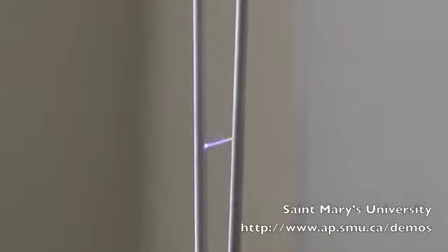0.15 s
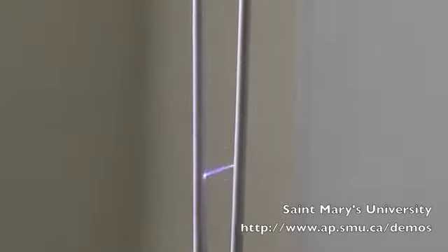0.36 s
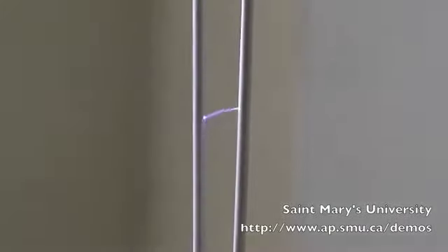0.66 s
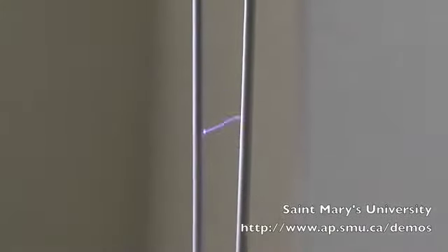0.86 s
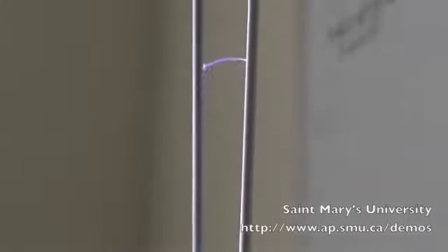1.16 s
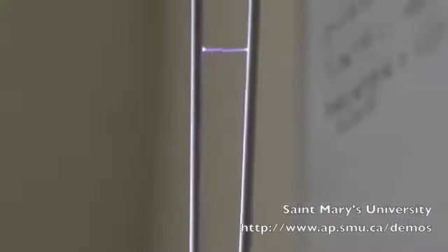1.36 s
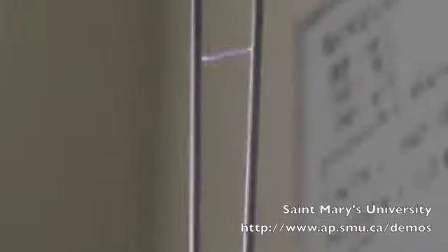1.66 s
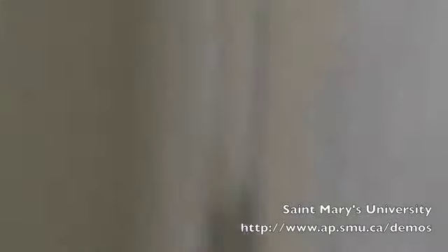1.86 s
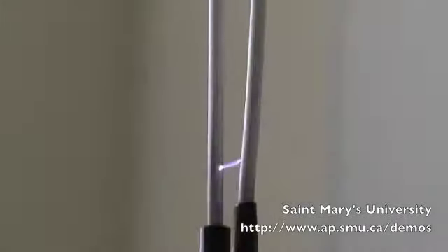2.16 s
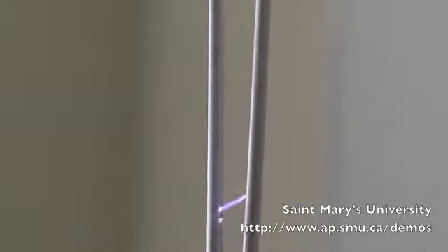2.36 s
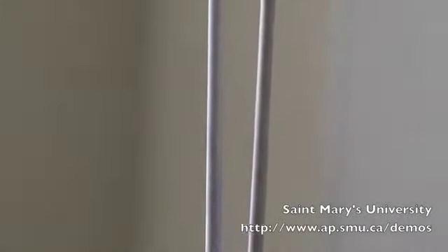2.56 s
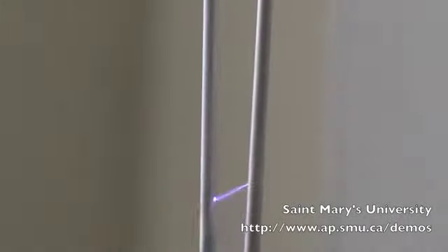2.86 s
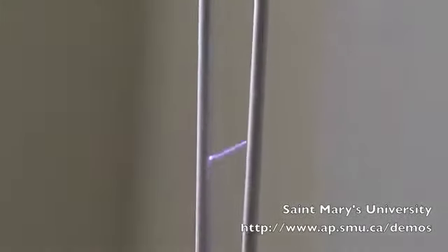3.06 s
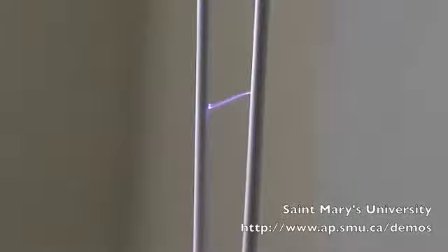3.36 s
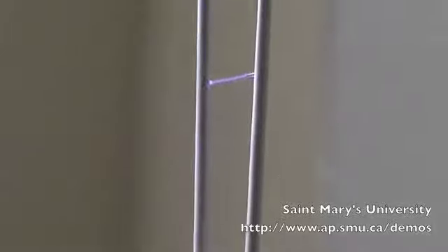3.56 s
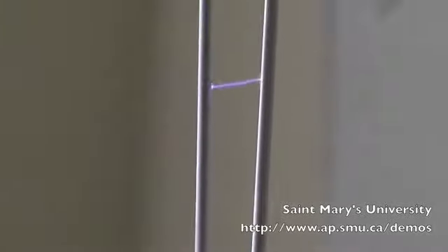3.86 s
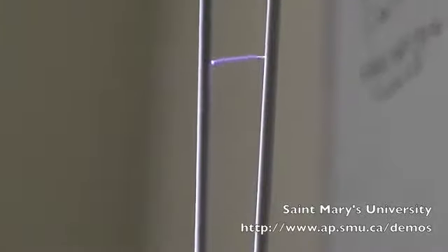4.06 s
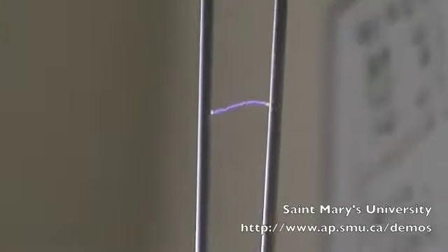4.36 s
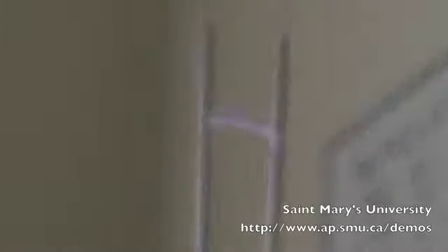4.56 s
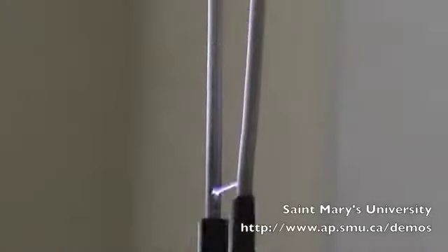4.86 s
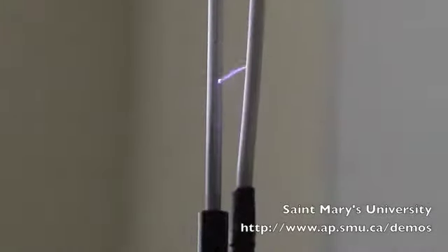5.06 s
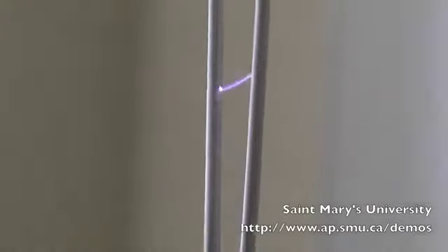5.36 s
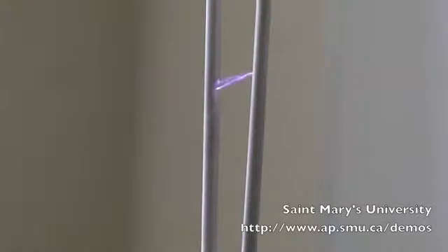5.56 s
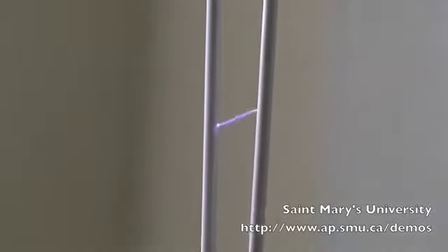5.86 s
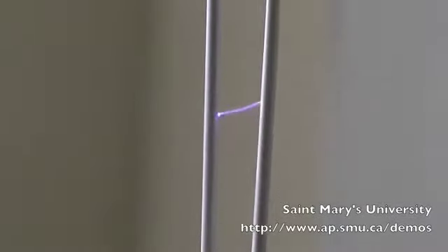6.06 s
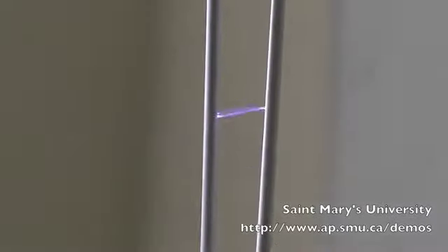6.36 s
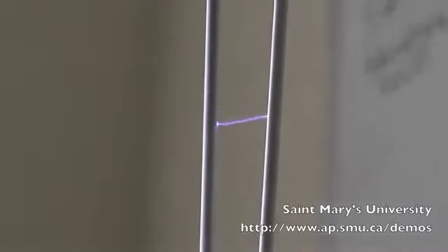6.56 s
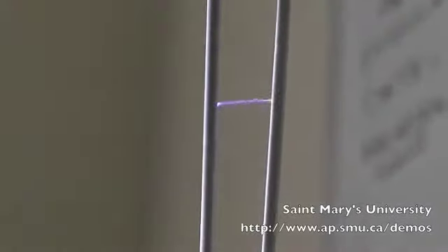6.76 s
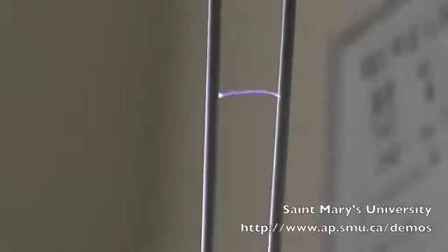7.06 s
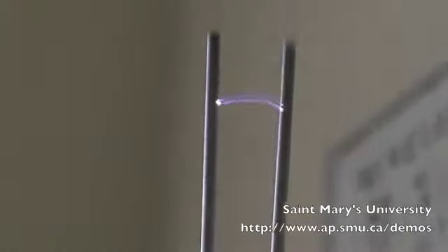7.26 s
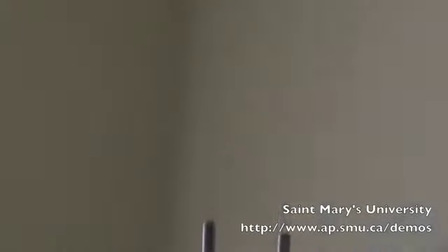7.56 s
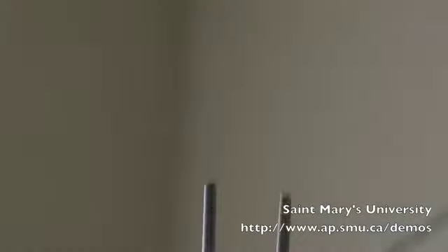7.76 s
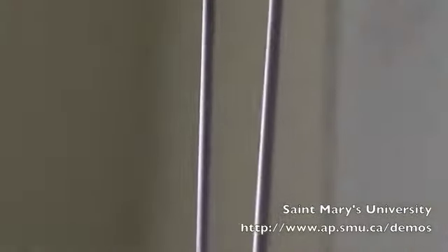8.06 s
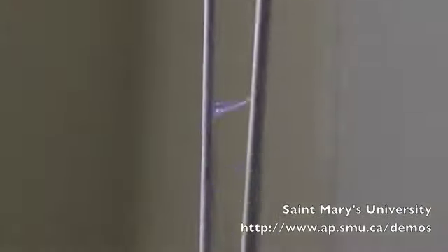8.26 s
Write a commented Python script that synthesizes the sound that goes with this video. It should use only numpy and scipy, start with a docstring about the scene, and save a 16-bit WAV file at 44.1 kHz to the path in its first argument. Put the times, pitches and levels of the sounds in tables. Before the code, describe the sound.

High-voltage arc climbs two upright rods with a harsh, steady 60-per-second snapping buzz, its hollow colour sliding as it rises and restrikes.

```python
"""From the start a high-voltage arc buzzes up two upright rods in a hard-walled room: one snap per mains cycle,
its echoes sliding in time as the arc rises. Near 2 s it breaks at the top and strikes again below, and one train of
sparks fades as another swells; a wavering low drone then passes beneath until 5 s. The trains cross once more
before the new strike at 4.8 s, and a last strike follows at 7.6 s while a deep noise rumble swells.
Snaps and echoes are shaped clicks, the lower harmonics ring as standing waves, and dull air noise lies under all."""
import sys
import numpy as np
from scipy import signal
from scipy.fft import rfft, irfft, next_fast_len
from scipy.io import wavfile
from scipy.ndimage import uniform_filter1d

SR = 44100
rng = np.random.default_rng(int(sys.argv[2]) if len(sys.argv) > 2 else 0)


def boost_factor(decibels):
    """Convert a level in decibels to a linear amplitude factor."""
    exponent = np.asarray(decibels, float) / 20
    return 10 ** exponent


def pcm_store(signal):
    """Save signal as 16-bit PCM."""
    levels = np.round(np.clip(np.atleast_2d(signal), -1, 1) * 32767)
    wavfile.write(sys.argv[1], SR, levels.astype(np.int16).T)


N = 370881

# colour of the room air, relative per Hz: pitch_hz, level_db
AIR_COLOUR = [(20, -1.5), (35, -9), (50, -19), (70, -6.5), (130, -2), (250, -5.5), (350, -6.5), (600, -4.5),
              (1500, -5.5), (4000, -38)]
# deep rumble: start_s, level_db
RUMBLE_LEVEL = [(0.0, -78), (2.2, -90), (6.3, -83), (6.6, -90), (7.1, -72), (7.6, -76), (8.2, -69),
                (8.41, -73)]
# drone glide: start_s, pitch_hz, level_db
DRONE_GLIDE = [(2.2, 93.5, -82), (2.33, 94.4, -73), (2.6, 94, -72), (2.66, 95, -63), (3.25, 97.7, -62),
               (3.4, 104.5, -66), (3.7, 104.4, -65), (4.02, 109, -65), (4.3, 106.4, -73), (4.83, 108, -64),
               (5.05, 100, -85)]
# brief drops in the drone's main tone: centre_s, depth_db
DRONE_DIPS = [(3.33, 13), (3.58, 10), (3.67, 22), (4.14, 10), (4.24, 18)]

# arc loudness, swelling and sagging: start_s, level_db
ARC_SURGE = [(0.0, -29.5), (0.02, -29.5), (1.5, -30), (1.92, -34.5), (2.58, -29.5), (3.61, -29.5),
             (4.0, -31), (4.54, -31), (4.78, -36.5), (4.87, -33), (5.15, -32.5), (5.22, -30), (5.5, -31),
             (5.57, -29.5), (7.17, -31.5), (7.5, -30), (7.82, -28), (8.39, -29), (8.41, -29)]
# a climb, slow to start and stalling half way: age_s (at usual pace), height (0-1),
# snap_db (peak above arc level, before trims), room_db (scattered room against snap, before trims)
CLIMB_SHAPE = [(0, 0.03, 22, 5), (.4, .05, 22.5, 3.5), (.7, 0.28, 23, 2), (1.0, 0.32, 22.5, 2.5),
               (1.25, 0.47, 23, 2.5), (1.55, 0.56, 22.5, 2), (1.7, .51, 22.5, 3), (1.95, 0.64, 23, 2),
               (2.3, .9, 23, 4), (2.72, 0.95, 23.5, 3.5)]
# where the arc sits, climbs differing in pace: start_s,
# place (0 foot of the rods, 1 top, above 1.05 odd spots where it lingers)
ARC_TRACK = [(0, 0.15), (.5, .36), (1.25, 0.71), (1.77, 0.93), (1.78, 1.15), (1.86, 1.22), (2.1, 1.07),
             (2.11, 0.012), (4.84, 1), (4.85, 0.01), (5.45, 0.24), (5.9, .41), (6.5, .66), (7.25, 0.91),
             (7.55, 1.05), (7.56, 1.2), (7.63, 1.24), (7.8, 1.28), (8.17, 1.27), (8.19, 0.26), (8.41, 0.34)]
# spark trains: first_s, last_s, struck_s, place_ms (in the mains cycle), drift_ms_per_s
SPARK_TRAINS = [(0.009, 1.77, -.95, 13.01, -.345), (1.775, 2.1, 1.775, 12.538, -.31),
                (1.799, 2.11, -.61, 1.844, .03), (2.115, 4.874, 2.115, 1.803, -.08),
                (4.576, 4.838, 2.115, 12.39, .1), (4.843, 7.555, 4.843, 12.45, .034),
                (7.56, 8.41, 7.56, 12.54, -.18)]
# snap level of each train against the arc: first_db, last_db
TRAIN_SHARE = [(0, 0.7), (1, -5.5), (-4.5, -1), (1, -0.5), (-18, -4), (1, 0.1), (-0.5, 0.5)]
# which trains ring the standing waves, one entry per train: rings (1 yes, 0 no)
TRAIN_RINGS = [1, 1, 0, 1, 0, 1, 1]
# sparks that jump once more at the top of the rods and so arrive late: moment_s
RELAPSES = [4.947, 7.58]
# sparks that stand out, mainly in the treble: moment_s, stronger_db
UNEVEN_SPARKS = [(0.296, 2), (0.546, 2.5), (1.23, 1), (1.779, 3), (1.796, -12), (2.069, 1), (2.096, -17),
                 (2.103, 3.5), (3.636, 4), (4.053, 1), (5.68, -3), (5.93, -4), (6.064, 2.5), (6.38, 1.5),
                 (6.514, -4), (7.58, 2), (8.147, 1), (8.164, 1), (8.18, 1), (8.197, -2)]

# snap colour, relative per Hz: pitch_hz, level_db
SNAP_COLOUR = [(60, -57), (100, -23.5), (300, -14), (700, -5.5), (1300, -17.5), (2000, -13), (2950, -5.5),
               (5000, -4), (8500, 2), (11900, 2.5), (15700, -4.5)]
# share of the spark-to-spark change: pitch_hz, level_db
FICKLE_COLOUR = [(200, -28), (500, -14), (1000, -6), (1400, -3), (2000, 1), (3000, 0), (5000, 0),
                 (8000, -2), (16000, 5)]
# topmost treble that a short arc lacks: pitch_hz, level_db
TOPMOST_COLOUR = [(7500, -46), (10500, -10), (13000, -2)]
# clear echoes, the broad wall behind first: low_ms and high_ms (delay with the arc low, high),
# low_db and high_db (against snap), lag_ms (left later); all but the first are then coloured by the walls
CLEAR_ECHOES = [(3.016, 3.0, -6.5, -6.5, 0.0), (1.43, .86, -13.5, -12.5, .021),
                (.51, 1.01, -14.5, -15.5, -.021), (4.43, 4.09, -13.5, -15.5, -.031),
                (5.51, 3.91, -14.5, -18.5, .031), (13.41, 11.31, -17.5, -13.5, .031),
                (16.31, 14.71, -17.5, -14.5, -.031), (6.61, 6.16, -20.5, -13.5, .021),
                (13.51, 14.01, -13.5, -22.5, -.021), (11.71, 9.31, -14.5, -16.5, .041),
                (10.11, 9.76, -17.5, -15.5, -.041)]
# wall colour of all other echoes: pitch_hz, level_db
WALL_COLOUR = [(100, -11), (700, -12), (1500, 1.5), (2500, -2), (6000, -2.5), (12000, -5), (16000, -9.5)]

# standing waves, one row per mains harmonic from the second up:
# one level_db (rms at the reference arc level) for each of STANDING_PLACES
STANDING_LEVELS = [(-85.0, -80.0, -79.5, -81.0, -83, -80, -84, -91, -85, -77.0, -90.0, -91, -76),
                   (-79.0, -74.5, -82, -76, -81, -80.0, -82, -81.0, -78.0, -77.0, -95.0, -76.0, -73),
                   (-68.0, -66.5, -67.5, -68.5, -70, -70.0, -71.0, -70, -71.5, -69, -75.0, -67, -65.5),
                   (-74, -72.5, -75.0, -78, -79.0, -82.0, -78, -76.0, -71.5, -70.0, -70.0, -72.0, -77.0),
                   (-71.0, -71, -72.0, -71.0, -69.5, -69.0, -65.5, -66.5, -62, -62.0, -69.0, -77, -70),
                   (-71, -68.5, -69.0, -70.0, -71, -70.5, -71.0, -71.0, -70, -76.0, -71.0, -78, -66),
                   (-66, -64.0, -65.0, -66.0, -67.0, -68.0, -71, -72.0, -69.0, -63, -71.0, -67.0, -65.0),
                   (-76.0, -77.0, -71, -68, -67, -65.5, -65, -63.5, -64.0, -62, -70.0, -68, -70),
                   (-64, -60.5, -62.5, -64, -66.5, -67.0, -70, -78.0, -76.0, -83, -64, -62.5, -59),
                   (-59.0, -58.5, -59, -59, -58.5, -59, -60.5, -65, -62.0, -55.5, -81, -56, -55.5),
                   (-66.0, -64.0, -63.0, -62.5, -63.0, -63.0, -65, -61.0, -58.5, -56, -59.0, -68, -58),
                   (-65, -68.0, -71, -67, -68, -70, -64, -66.5, -64, -66, -63.0, -72, -71),
                   (-66.0, -66, -69, -70, -69, -69, -67.5, -64, -67.5, -66, -81.0, -68, -67.0),
                   (-55.5, -57.5, -61, -63.0, -65, -73, -91, -71.0, -67.0, -84, -65.0, -62, -62.0),
                   (-65, -69, -58.5, -57, -55.5, -56.5, -59.0, -57.0, -52.5, -58.5, -53.0, -59.5, -61.0),
                   (-64, -56, -60, -60.0, -66, -77.0, -68, -63, -55.5, -52, -77, -59.0, -53.5),
                   (-61, -59, -63, -61, -61, -65.5, -65, -66, -71, -64.0, -64.0, -60.0, -61),
                   (-67, -66, -63, -64.0, -66, -71.0, -71, -77.0, -66, -58, -58, -63.5, -59),
                   (-57, -61, -70, -70, -74, -74, -67, -64.0, -75, -67.0, -61, -58, -63),
                   (-62, -78, -77.0, -70, -57, -59, -58, -55.5, -56.5, -67.0, -57.0, -61, -71),
                   (-59.0, -54, -50.5, -51.0, -55.5, -66.0, -51.5, -59, -58, -55, -49, -59, -52.5),
                   (-73.0, -59, -59.5, -59.0, -62, -59.5, -55.5, -49.5, -53.5, -62, -50, -51.0, -52.5),
                   (-59.0, -59.0, -61, -59, -62, -65, -57, -69, -51.5, -47, -61, -69, -74),
                   (-59.0, -75, -73, -68.0, -64, -80, -69, -69.0, -56, -59, -65.0, -68, -74.0),
                   (-53.5, -59, -72, -64, -62.0, -65.0, -54, -58, -67, -55, -57, -52, -59),
                   (-57.5, -54.5, -62, -63, -62, -56, -67, -53, -56, -50, -51, -58.0, -57),
                   (-58, -58.0, -58.5, -56.0, -53.5, -59, -61, -53, -68, -52, -48, -61, -53),
                   (-61.0, -64, -63.0, -58.0, -52, -60.0, -54, -53, -57.5, -48.5, -58, -68, -64),
                   (-66.0, -53, -69, -78, -62.0, -64, -71, -68, -59, -83, -62.0, -55, -71.0),
                   (-67, -76, -64, -59, -68, -74, -81.0, -79.0, -67, -86.0, -79.0, -58, -66.0),
                   (-59, -53.0, -61, -70, -53.5, -61.0, -75.0, -72, -50.5, -52, -49.0, -57, -55.0),
                   (-54, -55, -63, -77, -63, -70.0, -68, -78.0, -56, -50.0, -65, -56, -69.0),
                   (-54, -62, -60, -58, -61, -78, -64, -55, -85, -72, -51, -60, -49),
                   (-78, -61, -57, -66.0, -57, -57, -62, -66, -60, -53, -48, -57.0, -52),
                   (-82, -63, -86.0, -77, -70, -74.0, -93, -61.0, -51, -70.0, -78.0, -61.0, -88),
                   (-59.0, -56.0, -66, -73.0, -65, -64, -57.0, -61, -61.0, -64, -62.0, -77.0, -78),
                   (-65.0, -61, -59.0, -55.0, -70, -58, -55, -76, -52, -65.0, -47.0, -60, -52.0),
                   (-72.0, -62, -63, -66, -56.0, -54, -50.5, -52.5, -55, -55.0, -54.0, -51.0, -55),
                   (-65.0, -60, -62, -58, -51, -60, -63, -74.0, -47, -50.0, -59.0, -67, -52),
                   (-64.0, -53, -64.0, -64, -81.0, -82, -81.0, -58, -58, -66.0, -55, -66, -62),
                   (-57, -59, -83, -64, -60, -60.0, -73.0, -63.0, -65, -80.0, -69.0, -72.0, -56),
                   (-65.0, -72, -60, -63, -53, -61, -52, -56, -51, -75.0, -58, -62.0, -61),
                   (-59.0, -58, -53, -69, -54.0, -56, -53, -66, -62.0, -56.0, -59.0, -52, -58),
                   (-60.0, -54, -46.5, -71, -61.0, -52, -50, -49.5, -52.0, -47, -62, -70, -54),
                   (-59, -59, -49, -67, -57, -59, -59, -61, -54, -49, -58, -67.0, -69),
                   (-71.0, -79, -85.0, -74.0, -89.0, -76.0, -78, -69, -85.0, -69, -54, -59, -75.0),
                   (-56.0, -62.0, -59, -65, -61, -78.0, -60, -50, -61.0, -55, -57.0, -59.0, -54),
                   (-55.0, -51.0, -60, -55, -55, -57, -68, -57, -49.5, -52, -61, -62.0, -63),
                   (-72, -59, -60, -43.5, -53.5, -51, -51, -60, -48, -60, -48.0, -60, -64),
                   (-57.0, -65, -49, -69, -57.0, -51, -56, -51, -53, -54.0, -65, -62, -56),
                   (-55, -58.0, -74, -60, -64, -61.0, -68, -55, -60.0, -59, -71.0, -62, -64),
                   (-79.0, -53, -62.0, -57, -65, -67.0, -65.0, -67, -73.0, -63.0, -59.0, -57, -63),
                   (-52.0, -65, -49, -52.0, -60, -62, -62, -64, -65, -60.0, -64.0, -67, -49),
                   (-49, -57, -48.5, -72, -63, -53, -49, -71, -50, -50, -49, -67, -47.5),
                   (-61, -49.5, -56, -67.0, -68, -75, -59, -49, -56.0, -64, -66.0, -57.0, -50),
                   (-51, -66, -67.0, -71.0, -51, -56, -52, -65, -45.5, -68, -55.0, -65, -59),
                   (-65.0, -64.0, -66.0, -83.0, -71, -74.0, -68.0, -74, -68, -62.0, -53, -58, -58),
                   (-77.0, -56.0, -58, -56, -65, -66.0, -54, -60, -73, -65, -56.0, -57, -61),
                   (-65, -63, -47.5, -64.0, -50.0, -54, -52.0, -55.0, -52, -53, -56.0, -48, -60),
                   (-58, -55, -63, -59, -52, -61, -55, -50.5, -54, -53, -50.0, -57.0, -51),
                   (-47, -71.0, -58, -70, -50, -52.5, -58, -51, -52, -48, -59.0, -69, -55.0),
                   (-61.0, -59.0, -81.0, -73.0, -65.0, -63.0, -60.0, -61, -55, -57, -58.0, -56, -79.0),
                   (-55.0, -69, -59.0, -53, -61.0, -74, -62.0, -60, -73.0, -72.0, -75.0, -45, -57.0),
                   (-59.0, -67, -70, -52, -51, -52, -66.0, -68, -52, -67, -74.0, -63, -53),
                   (-76, -60, -80, -64, -58, -50, -70, -47, -62, -54.0, -63, -55.0, -71)]
# arc places of those columns, as in ARC_TRACK: place
STANDING_PLACES = [.03, .14, .25, .36, .47, .58, .69, .8, .91, 1.02, 1.1, 1.2, 1.3]
# bounces between facing walls: delay_ms, kept (share 0-1), stretch (share of delay, foot to top)
WALL_BOUNCES = [(3.01, 0.84, 0.0013), (10.3, 0.87, -.012), (6.7, 0.84, 0.01386), (4.7, 0.43, -.02)]
# where single paths take over from standing waves: pitch_hz, level_db
PATHS_ABOVE = [(3800, -60), (3900, -6), (4020, 0)]

# left-right unlikeness of the two microphone ports: pitch_hz, level_db
PORT_LEAK = [(150, -22), (400, -23), (700, -10.5), (1100, -12.5), (1400, -16), (2000, -28), (4000, -10.5),
             (16000, -26)]
# steep upper edge: pitch_hz, level_db
UPPER_EDGE = [(15720, 0), (15770, -20), (15850, -22), (15900, -55), (16300, -80)]

MAINS_HZ = 59.99
FARTHER_MS, CLIMB_S = 0.58, 2.72    # extra travel time from the top of the rods, usual climb time
STANDING_ARC_DB = -30.5             # reference arc level
FIRST_HARMONIC, STANDING_TURN = 2, -1.77    # turn in radians


def coloured(x, spectrum, turn=0):
    """Shape x by a (pitch_hz, level_db) table and turn its phase by a number of radians."""
    count = x.shape[-1]
    size = next_fast_len(count + 4096)
    hz, db = np.transpose(spectrum)
    grid = np.maximum(np.arange(size // 2 + 1) * SR / size, 1)
    gain = boost_factor(np.interp(np.log(grid), np.log(hz), db))
    return irfft(rfft(x, size) * gain * np.exp(1j * turn), size)[..., :count]


def clicks(seconds, sizes, fine_steps=4):
    """Clicks at exact moments: laid on a finer grid, then brought down to the sample rate."""
    length = N * fine_steps
    place = np.clip(seconds.ravel() * SR * fine_steps, 0, length)
    whole, part = place.astype(int), place % 1
    sizes = sizes.ravel() * (place > 0)
    fine = np.bincount(whole, sizes * (1 - part), length + 2)
    fine[1:] += np.bincount(whole, sizes * part, length + 2)[:-1]
    return fine_steps * signal.resample_poly(fine[:length], 1, fine_steps)


def room_air(air_db=-66.5, side_db=-2):
    """Dull steady air noise, partly alike left and right, over a deep rumble that swells late."""
    mid, side = coloured(rng.standard_normal((2, N)), AIR_COLOUR)
    air = boost_factor(air_db) / mid.std() * (mid + boost_factor(side_db) * side * [[1], [-1]])
    s, db = np.transpose(RUMBLE_LEVEL)
    band = signal.butter(2, [57, 70], "band", fs=SR, output="sos")
    rumble = signal.sosfilt(band, rng.standard_normal(N))
    return air + boost_factor(np.interp(np.arange(N) / SR, s, db)) * rumble / rumble.std()


def drone(dip_s=0.021, octave_db=-12, flicker_db=4):
    """A low wavering sine with a flickering octave, like a far motor."""
    s, hz, db = np.transpose(DRONE_GLIDE)
    t = np.arange(N) / SR
    phase = 2 * np.pi * np.cumsum(np.interp(t, s, hz)) / SR
    level_db = np.interp(t, s, db)
    dip_db = sum(depth * np.exp(-((t - at) / dip_s) ** 2) for at, depth in DRONE_DIPS)
    flicker = np.interp(t, np.arange(200) / 20, rng.standard_normal(200))    # 20 new values a second
    fade = np.interp(t, [s[0] - 0.1, s[0], s[-1], s[-1] + 0.043], [0, 1, 1, 0])
    low_tone = boost_factor(level_db - dip_db) * np.sin(phase)
    octave = boost_factor(level_db + octave_db + flicker_db * flicker) * np.sin(2 * phase)
    left_right = boost_factor([[1.2], [-1.2]])    # dB
    return np.sqrt(2) * fade * (low_tone + octave) * left_right


def paths(count, t60_s=0.5, room_db=3):
    """Many faint paths by walls, floor and ceiling: delay, slide with height, size, left-right lag in seconds."""
    draw = rng.random((count, 3))
    delay = 0.0004 - t60_s / np.log(1000) * np.log(draw[:, 0]) * 0.7
    size = np.cos(2 * np.pi * draw[:, 2]) * boost_factor(-17 * delay / t60_s)
    # most paths go by the ceiling and shorten as the arc climbs
    slide = -0.0024 * draw[:, 1] ** 1.428 + 0.000391
    lag = 2.8e-5 * rng.standard_normal(count)
    return delay, slide, size * boost_factor(room_db) / np.linalg.norm(size), lag


def sparks(uneven_db=0.9, steady_ms=0.004, unsteady_ms=0.087, settle_s=0.036):
    """One spark per mains cycle and train: moment, height, size, room level, sharpness, place, ringing level."""
    rows = []
    cycle = np.arange(-30, N / SR * MAINS_HZ) / MAINS_HZ
    since, *columns = np.transpose(CLIMB_SHAPE)
    for train, share_db, rings in zip(SPARK_TRAINS, TRAIN_SHARE, TRAIN_RINGS):
        first, last, struck, place_ms, drift = train
        s = np.clip(cycle + place_ms / 1000, first, last)
        age = s - struck
        travel_ms = FARTHER_MS * (age / CLIMB_S) ** 2
        moment = cycle + (place_ms + drift * (s - first) + travel_ms) / 1000
        # a train under way at the start keeps its earlier sparks, for their echoes
        going = (moment <= last) & ((moment >= first) | (first < 0.02))
        place = np.interp(s, *np.transpose(ARC_TRACK))
        along = np.where(place < 1.05, place * CLIMB_S, age)
        height, snap_db, room_db = (np.interp(along, since, c) for c in columns)
        arc_db = np.interp(s, *np.transpose(ARC_SURGE))
        db = snap_db + arc_db + np.interp(s, [first, last], share_db)
        ringing_db = arc_db - 200 * (1 - rings)
        rows.append(np.array([moment, height, db, room_db, age, place, ringing_db])[:, going])
    moment, height, db, room_db, age, place, ringing_db = np.hstack(rows)
    for s in RELAPSES:
        again = np.argmin(abs(moment - s))
        moment[again] += FARTHER_MS / 1000
        height[again], place[again] = 1, 1
    # a fresh arc strikes unevenly until it settles
    jitter_ms = steady_ms + unsteady_ms * np.exp(-age / settle_s)
    chance = rng.standard_normal((len(moment), 2))
    sharp_db = uneven_db * chance[:, 0]
    for s, stronger_db in UNEVEN_SPARKS:
        sharp_db[np.argmin(abs(moment - s))] = stronger_db
    moment = moment + jitter_ms / 1000 * chance[:, 1]
    return moment, height, db, room_db, sharp_db, place, ringing_db


def standing_hz():
    """Mains harmonics that the standing waves carry, in Hz."""
    return MAINS_HZ * (FIRST_HARMONIC + np.arange(len(STANDING_LEVELS)))


def standing(moment, place, db, jitter_ms=0.0031):
    """Lower harmonics: each spark rings the standing waves of its place, spread out in time by wall bounces."""
    levels, hz = np.transpose(STANDING_LEVELS), standing_hz()
    when = moment + jitter_ms / 1000 * rng.standard_normal(moment.shape)
    length = next_fast_len(N + 4096)    # the same grid as in coloured()
    grid = np.arange(length // 2 + 1) * SR / length
    low, out = grid < 4100, 0
    for share, level_db, at in zip(np.eye(len(levels)), levels, STANDING_PLACES):
        blend = np.interp(place, STANDING_PLACES, share)    # neighbouring places crossfade
        size = blend * boost_factor(db - STANDING_ARC_DB) * SR / MAINS_HZ / np.sqrt(2)
        turn = np.full(len(grid), STANDING_TURN)
        for delay_ms, kept, stretch in WALL_BOUNCES:
            loop_s = delay_ms * (1 + stretch * (at if at < 1.05 else 0.25)) / 1000
            loop = np.exp(-2j * np.pi * grid[low] * loop_s)
            turn[low] += np.angle((kept + loop) / (1 + kept * loop))    # all-pass: phase only
        spectrum = [(60, -110), *zip(hz, level_db), (4020, -120)]
        out = out + coloured(clicks(when, size), spectrum, turn=turn)
    return out


def hollows(share=1.1):
    """Peaks and hollows of the standing waves over all places, against their neighbours: pitch_hz, level_db."""
    mean_db = np.mean(STANDING_LEVELS, axis=1)
    relief_db = share * (mean_db - uniform_filter1d(mean_db, size=7) - 2.0)
    return [*zip(standing_hz(), relief_db), (4020, 0)]


def arc(wriggle_ms=0.0067, beam_db=3.5, short_arc_loss=0.21):
    """Snaps, echoes and standing waves; the arc wriggles, so each path changes a little from spark to spark."""
    moment, height, db, room_db, sharp_db, place, ringing_db = (c[:, None] for c in sparks())
    shape = rng.standard_normal((len(moment), 3))    # how the arc is bent, in three directions

    def heard(delay, size, lag, wriggle=1):
        """Steady and changing sound at both ports; sparks spend like energy, so mostly the treble varies."""
        seen = rng.standard_normal((np.shape(delay)[1], 3))
        along = wriggle * shape @ (seen / np.linalg.norm(seen, axis=1, keepdims=True)).T
        when = moment + delay + wriggle_ms / 1000 * along
        change = size * (boost_factor(sharp_db + beam_db * along[:, ::-1]) - 1)
        ports = [when + lag / 2, when - lag / 2]
        return np.array([[clicks(at, size), coloured(clicks(at, change), FICKLE_COLOUR)] for at in ports])

    low_ms, high_ms, low_db, high_db, lag_ms = np.transpose(CLEAR_ECHOES)
    after = (low_ms + (high_ms - low_ms) * height) / 1000
    echo = boost_factor(db + low_db + (high_db - low_db) * height)
    lag = lag_ms / 1000
    near = heard(0 * height, boost_factor(db), 0, wriggle=0)
    # the broad wall behind returns the bass too
    near += heard(after[:, :1], echo[:, :1], lag[:1], wriggle=0.49)
    # a short arc snaps with less of its topmost treble
    order = np.argsort(moment[:, 0])
    shortness = np.interp(np.arange(N) / SR, moment[order, 0], 1 - height[order, 0])
    near -= short_arc_loss * shortness * coloured(near, TOPMOST_COLOUR)

    far = heard(after[:, 1:], echo[:, 1:], lag[1:])
    delay, slide, size, path_lag = paths(count=1800)
    scattered = heard(delay + slide * height, size * boost_factor(db + room_db), path_lag)
    far = coloured(far + scattered, WALL_COLOUR)
    # the wall behind the arc doubles these paths as well
    behind = round(low_ms[0] / 1000 * SR)
    far[..., behind:] += boost_factor(-13.0) * far[..., :-behind].copy()

    # below the crossover, standing waves replace what both ports share of the steady part
    steady, change = np.swapaxes(near + far, 0, 1)
    alike = steady.mean(axis=0)
    direct = steady - alike + coloured(alike, PATHS_ABOVE) + coloured(change, hollows())
    # the snap is an N-shaped pressure wave: a click turned by about a quarter cycle
    unit = abs(coloured(np.arange(999) == 500, SNAP_COLOUR, turn=-1.8)).max()
    snaps = boost_factor(-0.47) / unit * coloured(direct, SNAP_COLOUR, turn=-1.61)
    return snaps + standing(moment, place, ringing_db)


def scene():
    """Arc, drone and room air."""
    return arc() + drone() + room_air()


def band_limit(x):
    """A steep low-pass at the top of the band."""
    return signal.sosfilt(signal.butter(12, 16760, fs=SR, output="sos"), x)


def record(dry):
    """The two ports differ, most in the low middle and around 4 kHz; the top is cut steeply."""
    unlike = coloured(dry.mean(axis=0), PORT_LEAK, turn=-1.67) * [[1], [-1]]
    mix = coloured(dry + unlike, UPPER_EDGE)
    return band_limit(mix)


dry = scene()
out = record(dry)
pcm_store(out)
```